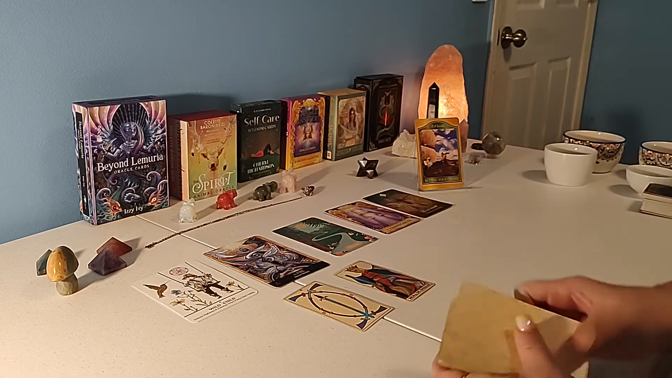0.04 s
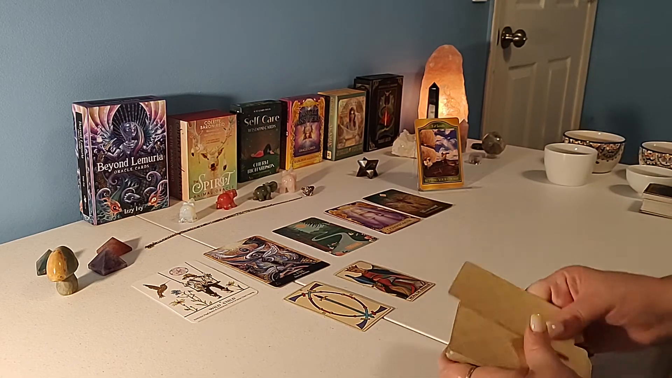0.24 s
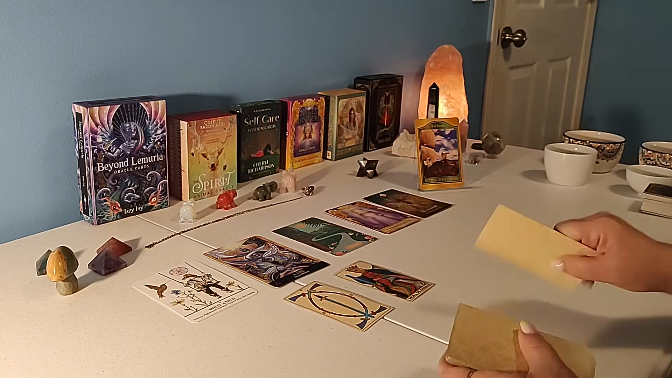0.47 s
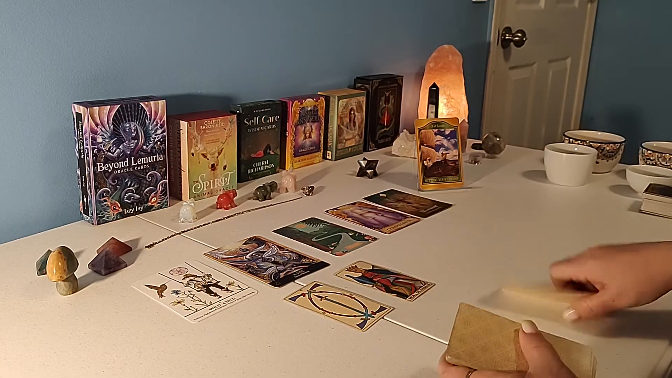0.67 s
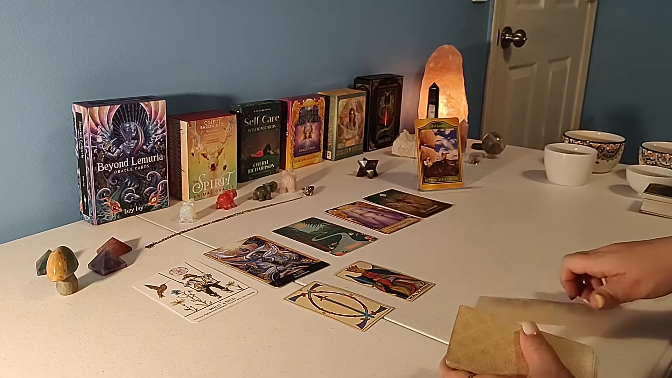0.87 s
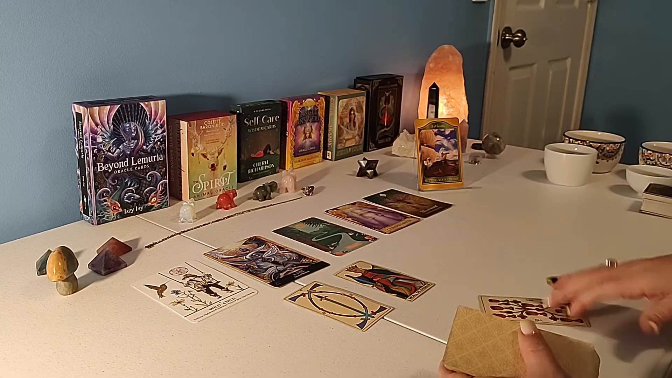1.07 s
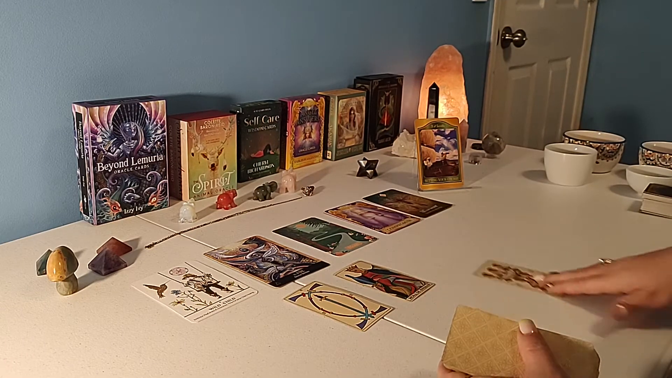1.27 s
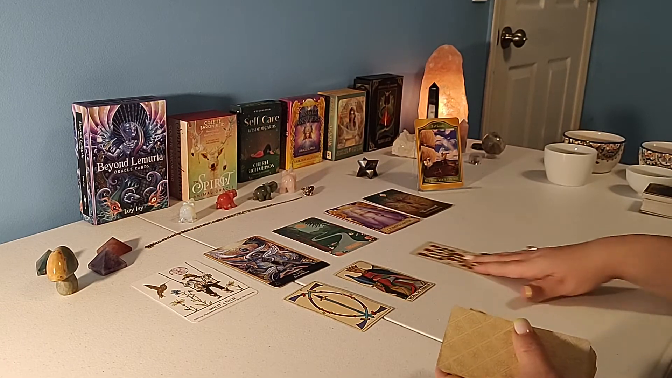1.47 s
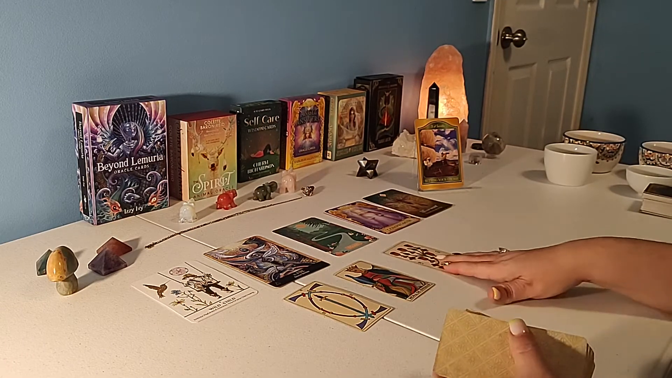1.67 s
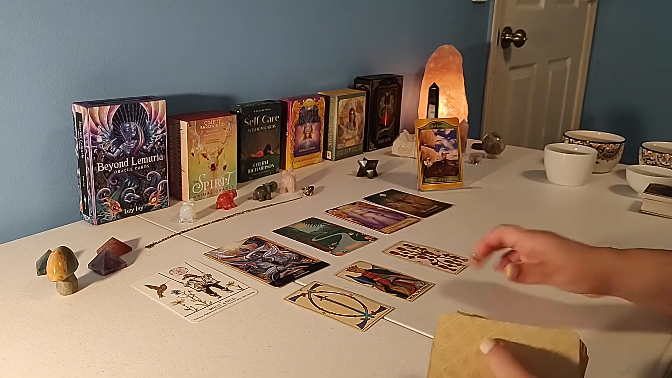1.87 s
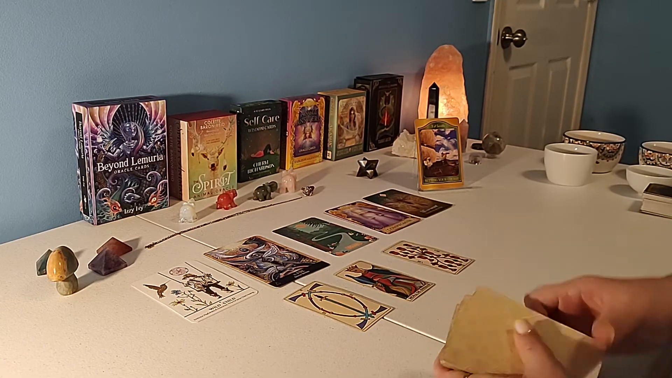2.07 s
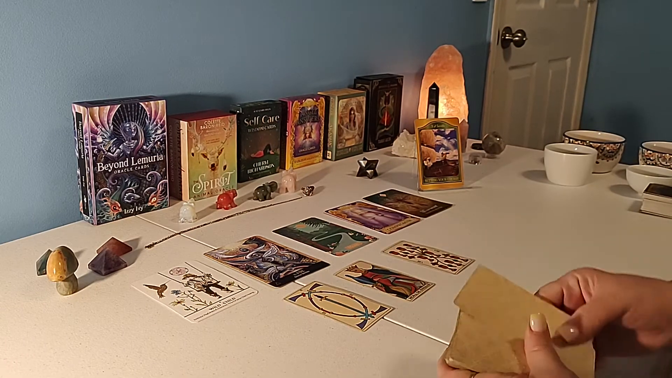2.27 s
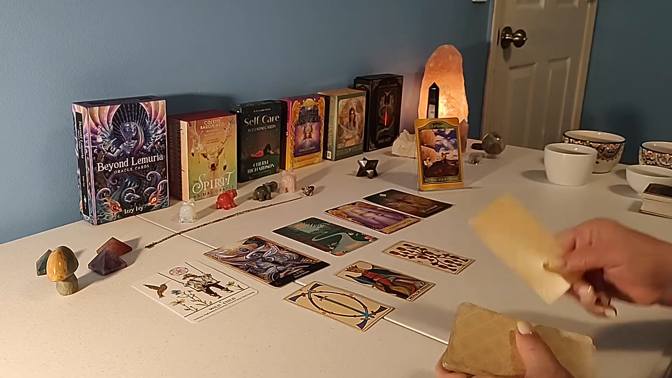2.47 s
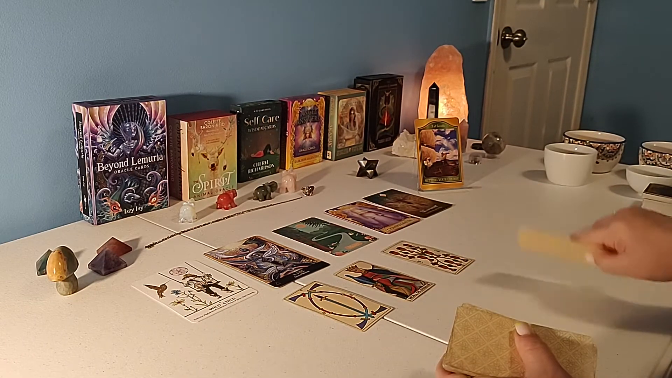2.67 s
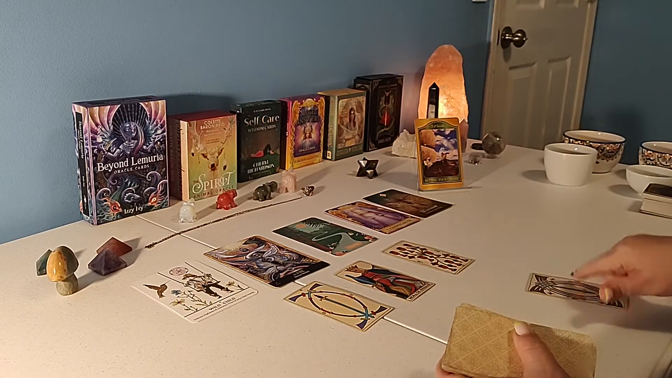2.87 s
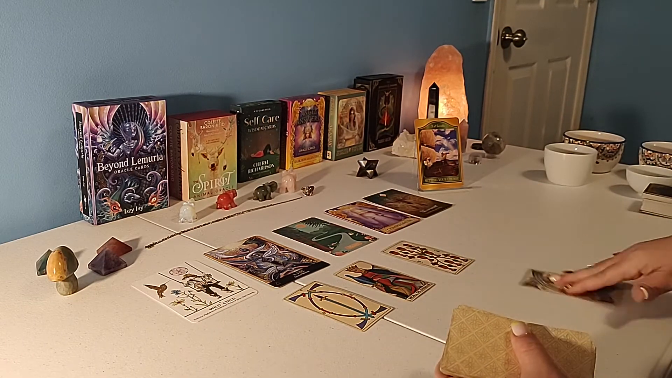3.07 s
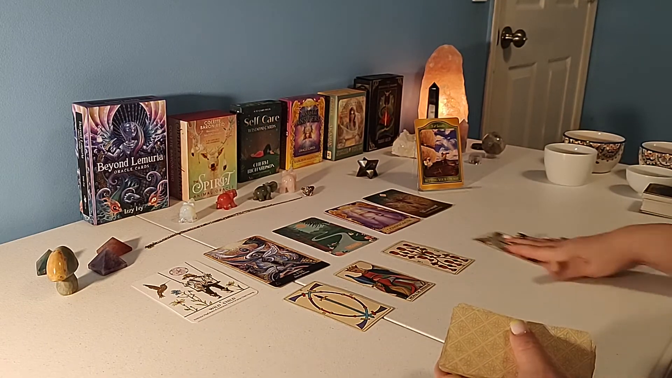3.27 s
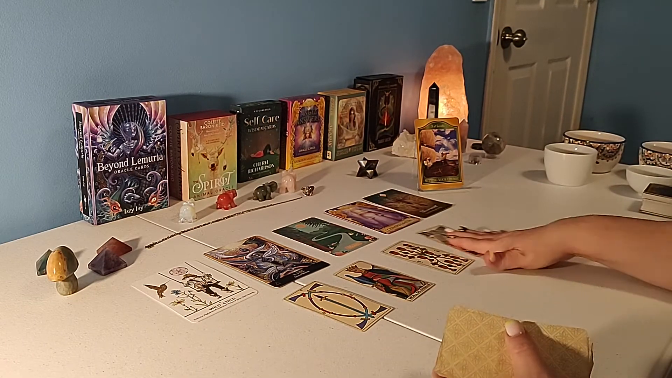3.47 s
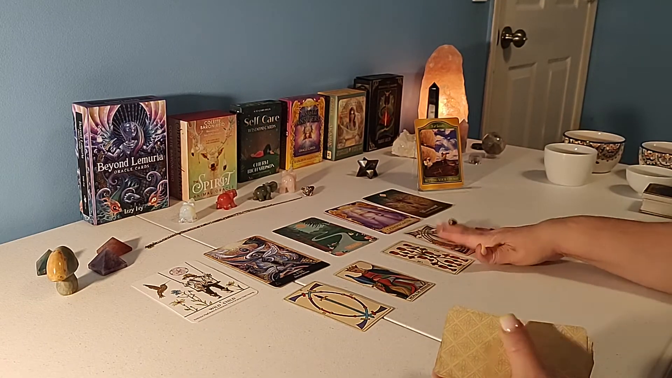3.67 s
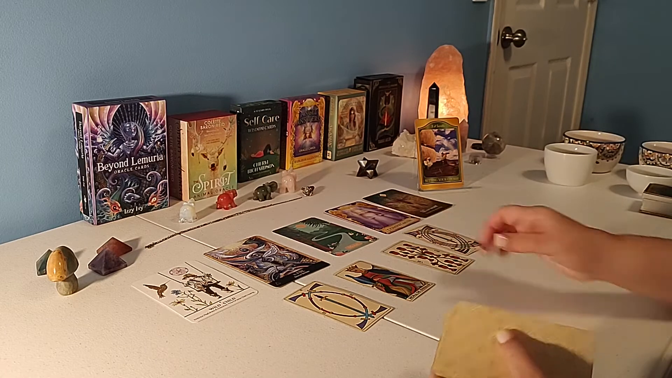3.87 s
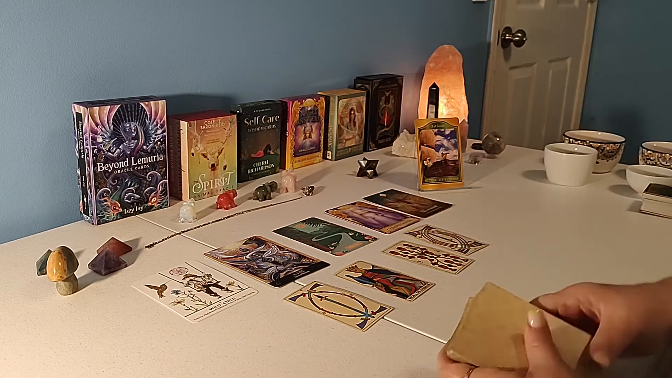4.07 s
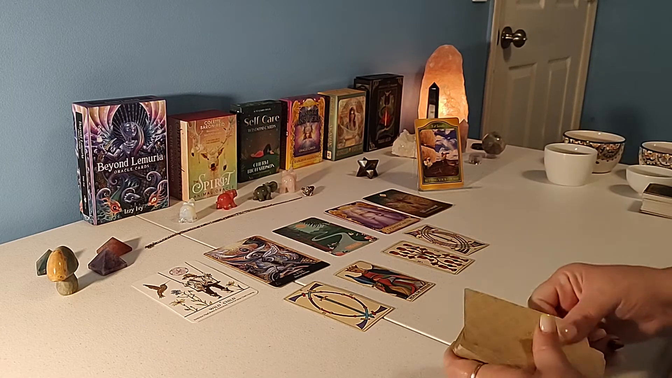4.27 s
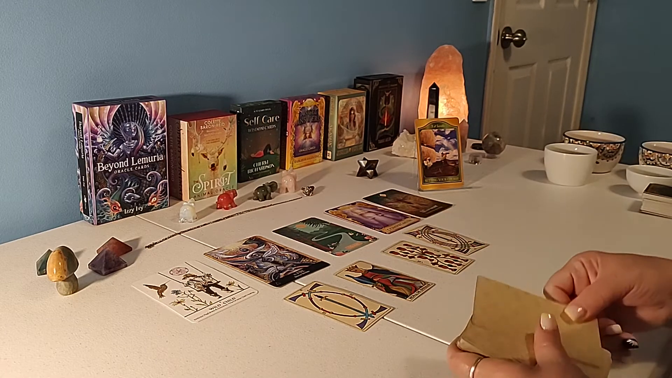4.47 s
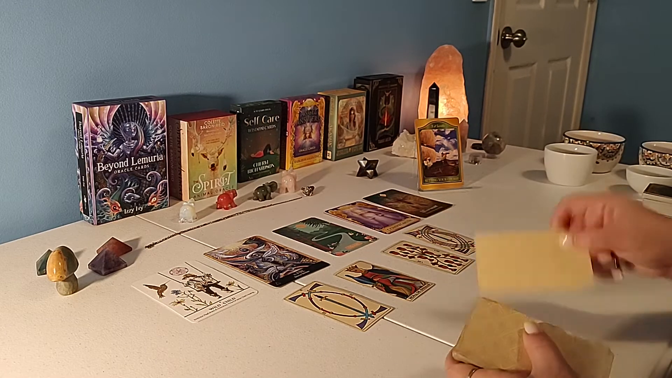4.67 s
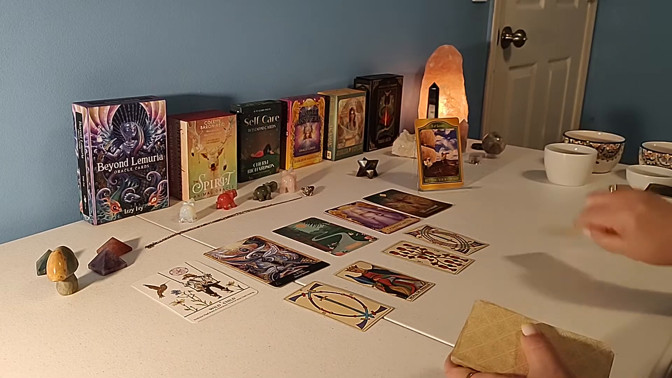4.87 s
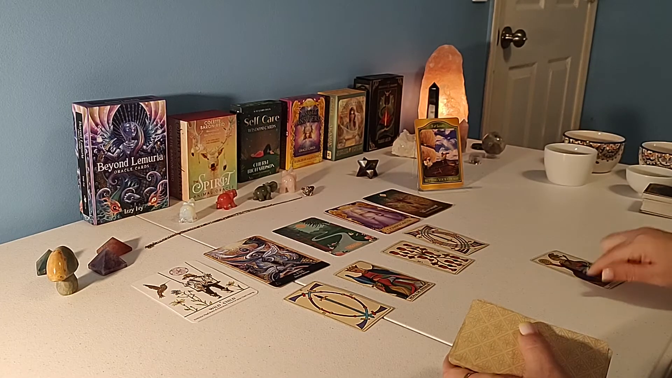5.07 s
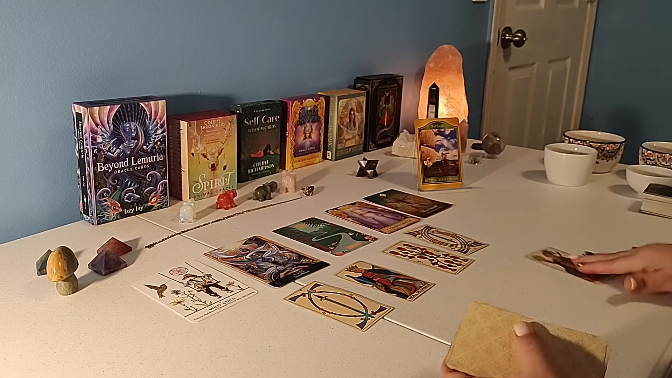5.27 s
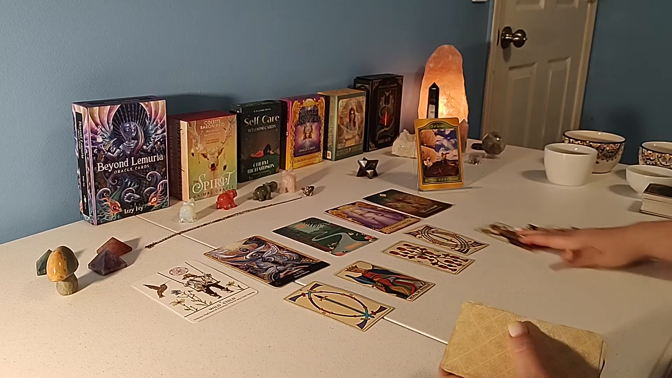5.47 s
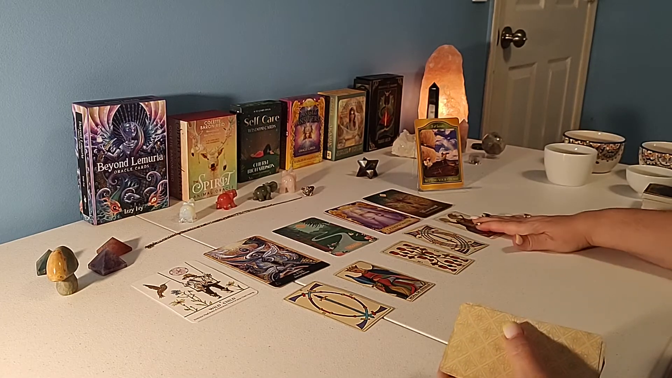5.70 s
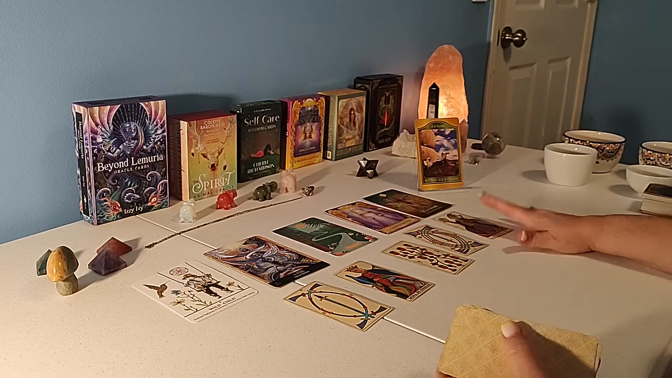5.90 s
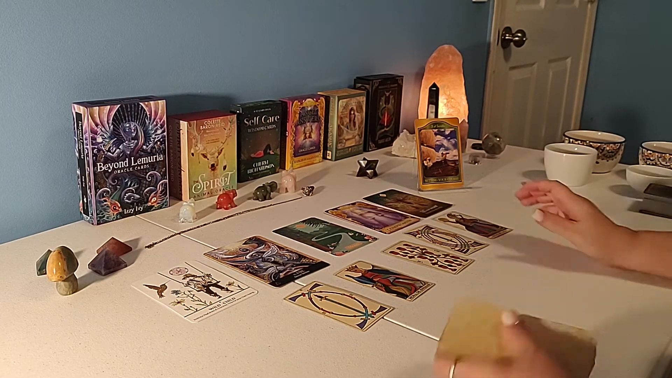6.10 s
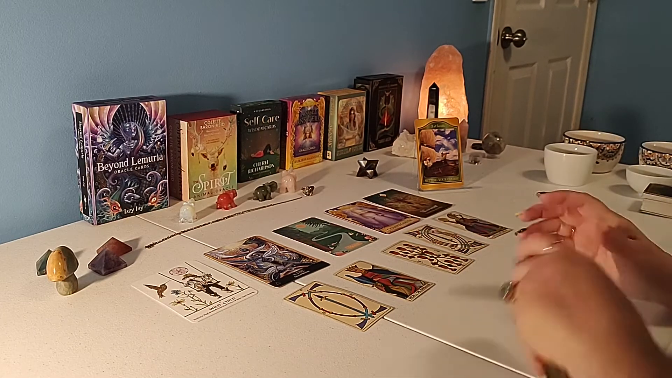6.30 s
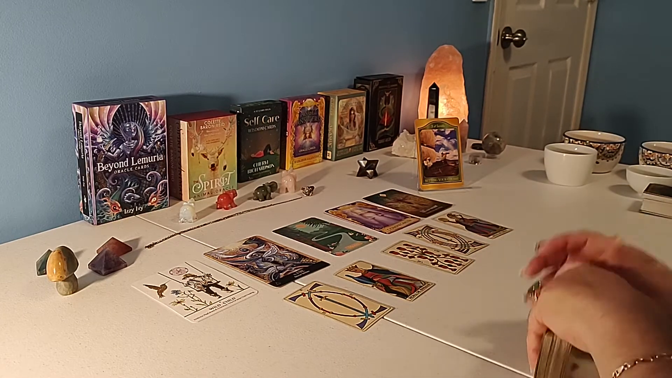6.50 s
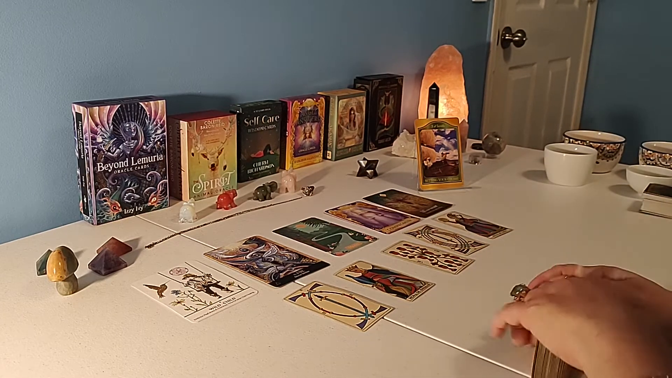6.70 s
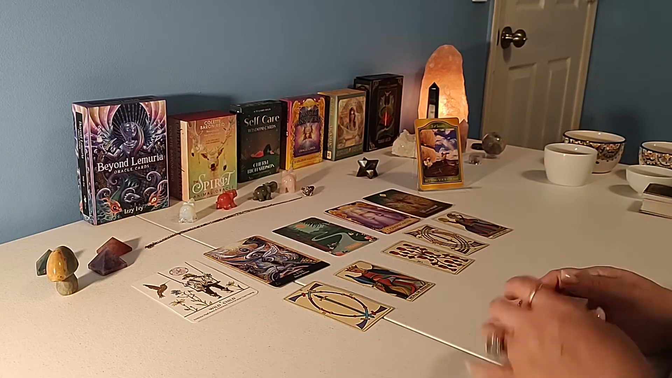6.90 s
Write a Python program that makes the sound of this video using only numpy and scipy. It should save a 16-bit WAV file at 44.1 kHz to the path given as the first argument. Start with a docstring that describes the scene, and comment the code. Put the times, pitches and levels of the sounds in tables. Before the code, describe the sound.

Three cards are drawn from a hand-held deck, snapped free, tapped down and slid hissing across a table, then the deck thumps down.

```python
"""Over quiet room air and a faint hum, a finger creaks on a hand-held deck of cards.
Three times a card is drawn with a rub, snaps free with a low pop, and clatters onto the ringing tabletop.
Fingertips tap, and each card is pushed into place with a hiss and a lower rasp; other cards brush past.
At the end the deck is put down in heavy, dull blows and its cards clap shut.
Rubs are filtered slips, hits are filtered clicks, slides are noise that follows speed; a small room echoes."""
import sys
import numpy as np
from scipy import signal
from scipy.fft import rfft, irfft
from scipy.io import wavfile

SR = 44100
rng = np.random.default_rng(int(sys.argv[2]) if len(sys.argv) > 2 else 0)


def master_out(mix):
    """Clip the mix to full scale and print it as 16-bit PCM to the path in sys.argv[1]."""
    frames = np.transpose(np.atleast_2d(mix))
    ceiling = np.clip(frames, -1, 1)
    pcm = np.round(ceiling * 32767).astype(np.int16)
    wavfile.write(sys.argv[1], SR, pcm)


N = 306223
TIME = np.arange(N) / SR  # seconds
# Levels of single sounds below are set before the room and the microphone colour them.


def undb(db):
    """Turn decibels into a gain."""
    return 10 ** (np.asarray(db) / 20)


def unit(x):
    """Scale to an average (rms) level of 1."""
    return x / np.sqrt(np.mean(x ** 2))


BLOW_S = 0.05  # a short sound's energy is averaged over this time


def blow(x, db):
    """Scale a short sound so that its energy, spread over BLOW_S, has the given level."""
    return x * undb(db) * np.sqrt(BLOW_S * SR / np.sum(x ** 2))


def along(points, hz):
    """Read between (Hz, value) points on a logarithmic pitch scale."""
    f, value = np.transpose(points)
    return np.interp(np.log(np.maximum(hz, 1)), np.log(f), value)


def colour(x, points, size=2048):
    """Filter to a (Hz, dB) curve, with nothing sounding before its cause."""
    log_gain = np.log(undb(along(points, np.fft.rfftfreq(size, 1 / SR))))
    # folding the cepstrum forward puts the filter's energy as early as possible
    cepstrum = irfft(log_gain)
    cepstrum[1:size // 2] *= 2
    cepstrum[size // 2 + 1:] = 0
    response = irfft(np.exp(rfft(cepstrum)))
    return signal.fftconvolve(x, response)[:len(x)]


def resonate(x, hz, width_hz):
    """Ring at one pitch, with gain 1 at its centre; a narrow width rings longer."""
    return signal.lfilter(*signal.iirpeak(hz, hz / min(width_hz, SR / 4), fs=SR), x)


def soften(x, top_hz, order=2):
    """Cut the treble, as a softer contact does."""
    return signal.sosfilt(signal.butter(order, min(top_hz, 0.45 * SR), fs=SR, output="sos"), x)


def add(track, at_s, x):
    """Mix a short sound into a track."""
    start = max(int(at_s * SR), 0)
    track[start:start + len(x)] += x[:N - start]


def grains(count, spread_db):
    """Dense fibre clicks: many small ones, a few large."""
    size = np.minimum(rng.exponential(size=count), 2 * np.pi)
    return unit(rng.standard_normal(count) * undb(spread_db * size))


def contact(chatter_ms, chatter_db, size=4096):
    """A first touch, then quickly dying chatter as the card settles."""
    x = grains(size, 3.0)
    x *= np.exp(-TIME[:size] / (max(chatter_ms, 0.2) / 1000))
    x *= undb(chatter_db) / np.sqrt(np.sum(x ** 2))  # energy relative to the first touch
    x[0] += 1
    return x


def diffuse(count, alike_hz):
    """Noise from all sides at two microphone ports: alike in the bass, unrelated in the treble."""
    likeness = 0.95 / (1 + (np.fft.rfftfreq(count, 1 / SR) / alike_hz) ** 2)
    shares = np.sqrt([(1 + likeness) / 2, (1 - likeness) / 2])
    mid, side = rfft(rng.standard_normal((2, count))) * shares
    return irfft(np.array([mid + side, mid - side]), count)


# tone of the room air: (frequency [Hz], relative level [dB per Hz])
AIR_SPECTRUM = [(20, -39.5), (38, -18), (58, -1), (95, -6), (140, 2), (210, -10), (350, -3), (470, -13),
                (650, -9), (1100, -14), (2000, -16.5), (4000, -21.5), (9000, -22), (16000, -17)]
# steady hum: (frequency [Hz], level [dB])
HUM = [(135, -80), (355, -76), (393, -87), (560, -88), (592, -90.5)]


def background(air_db=-67, waver_hz=5):
    """Quiet room air, with a hum of narrow noise bands whose loudness wavers."""
    air = np.array([colour(port, AIR_SPECTRUM) for port in diffuse(N, alike_hz=520)])
    hum = np.zeros(N)
    for hz, db in HUM:
        band = resonate(resonate(rng.standard_normal(N), hz, waver_hz), hz, waver_hz)
        hum += undb(db) * unit(band)
    return undb(air_db) * unit(air) + hum


# how long the room rings: (frequency [Hz], time to fall by 60 dB [s])
ROOM_DECAY = [(100, 0.25), (350, 0.27), (1000, 0.22), (3000, 0.24), (6000, 0.2), (15000, 0.15)]
# near walls and boxes: (delay [ms], relative level left [dB], relative level right [dB])
ECHOES = [(4.8, 0, 1.5), (6.3, 3, -1), (9.6, -7, -16.5), (15.3, -5.5, -21)]


def room(x, tail_db, echo_db, build_s=0.00089):
    """Direct sound, a few hard echoes and a diffuse tail whose highest treble dies first."""
    count = SR // 2
    t, f = TIME[:count], np.fft.rfftfreq(count, 1 / SR)
    # every call draws new noise, so each place has its own tail
    noise, centres = rfft(diffuse(count, alike_hz=405)), [hz for hz, _ in ROOM_DECAY]
    response = np.zeros((2, count))
    for share, (_, t60) in zip(np.eye(len(centres)), ROOM_DECAY):
        decay = undb(-60 * t / t60) * (1 - np.exp(-t / build_s))
        band = irfft(noise * along(list(zip(centres, share)), f), count)
        response += band * decay / np.sqrt(np.sum(decay ** 2))
    response *= undb(tail_db)
    # the hands work on the right, so that port hears them 6 samples sooner
    response[[0, 1], [6, 0]] += 1
    for ms, left_db, right_db in ECHOES:
        at = int(ms * SR / 1000) + rng.integers(0, 20, size=2)
        response[[0, 1], at] += undb(echo_db) * undb([left_db, right_db])
    response /= np.sqrt(np.sum(response ** 2) / 2)
    return signal.oaconvolve(x[None], response, axes=1)[:, :N]


# a finger creaks on the deck, then again lower as the grip settles: (time [s], level [dB], pitch [Hz])
CREAKS = [(0.021, -50, 563), (0.074, -45, 560), (.312, -61.5, 680), (1.191, -62, 620), (2.134, -64.5, 528),
          (4.044, -51, 630), (6.195, -45.5, 820)]
# the second creak comes later, quieter and at this share of the pitch; hiss is relative to each creak
CREAK_MS, SETTLE_S, SETTLE_DB, SETTLE_PITCH, CREAK_HISS_DB = 8.8, 0.036, -9.5, 0.59, -28
# a card is pulled along the deck, louder until it comes free:
# (time at the loudest [s], rise [ms], creak level [dB], pitch [Hz], hiss level [dB])
DRAWS = [(.44, 44, -59, 1260, -53), (2.51, 21, -51, 1030, -60.5), (4.757, 21, -50, 1600, -49.5)]
DRAW_FALL_MS = 6
# a card or hand brushes past, rising fast and trailing off:
# (time at the loudest [s], rise [ms], creak level [dB], pitch [Hz], hiss level [dB])
BRUSHES = [(0.591, 3.3, -39.5, 1140, -42), (0.605, 3.7, -44.5, 2214, -75), (0.98, 41, -66.5, 2850, -76),
           (1.84, 15, -76.5, 900, -80), (2.458, 14, -72, 2200, -60), (2.69, 19, -70, 2850, -63),
           (3.87, 26, -70.5, 895, -73), (4.39, 15, -88, 900, -74.5), (4.651, 12.3, -53.5, 1150, -50.5),
           (5.93, 69, -67.5, 2010, -80), (6.138, 27, -74, 1100, -52), (6.09, 50, -65, 3360, -76)]
BRUSH_TRAIL = 2.7  # fall time over rise time


def strokes():
    """Creaks, draws and brushes as swells of rubbing: (s, rise ms, fall ms, creak dB, pitch Hz, hiss dB)."""
    for s, db, hz in CREAKS:
        yield s, CREAK_MS, CREAK_MS, db, hz, db + CREAK_HISS_DB
        late_db = db + SETTLE_DB
        yield s + SETTLE_S, CREAK_MS, 2 * CREAK_MS, late_db, hz * SETTLE_PITCH, late_db + CREAK_HISS_DB
    for s, rise_ms, db, hz, hiss_db in DRAWS:
        yield s, rise_ms, DRAW_FALL_MS, db, hz, hiss_db
    for s, rise_ms, db, hz, hiss_db in BRUSHES:
        yield s, rise_ms, rise_ms * BRUSH_TRAIL, db, hz, hiss_db


# tone of rubbing faces and ticking edges: (frequency [Hz], relative level [dB per Hz])
TICK_SPECTRUM = [(40, -52), (200, -30), (1500, -6), (4000, -5), (8000, 0.5), (16000, -8)]


def rubs(slip_hz=170, width_share=0.4):
    """Skin and card stick and slip, ringing the held card, while the faces hiss."""
    slips = (rng.random(N) < slip_hz / SR) * rng.uniform(0.65, 1, N)
    slips += 0.023 * rng.standard_normal(N)
    hiss = unit(colour(grains(N, 2.2), TICK_SPECTRUM))
    out = np.zeros(N)
    for s, rise_ms, fall_ms, db, hz, hiss_db in strokes():
        away = (TIME - s) / (np.where(TIME < s, rise_ms, fall_ms) / 1000)
        near = np.abs(away) < 4  # beyond this the swell is silent
        swell = np.exp(-0.5 * away[near] ** 2)
        creak = swell * resonate(resonate(slips[near], hz, width_share * hz), hz, 1.1 * hz)
        out[near] += undb(db) * unit(creak) * np.sqrt(np.mean(swell ** 2))
        out[near] += undb(hiss_db) * swell * hiss[near]
    return out


# a bent card springs free of the deck:
# (time [s], pop level [dB], pitch [Hz], width [Hz], edge tick level [dB], low flap level [dB])
SNAPS = [(0.4512, -32, 1220, 606, -46.5, -46), (2.527, -48.5, 710, 494, -49.5, -60),
         (2.5382, -56, 700, 296, -63, -58), (4.7655, -37.5, 1210, 1300, -43.5, -50)]
# tone of the card's free end flapping: (frequency [Hz], relative level [dB per Hz])
FLAP_SPECTRUM = [(60, -48), (170, -31), (250, 1), (350, -17), (520, 4.5), (900, -8), (3000, -35.5)]


def snaps():
    """The edge ticks past the deck, the bent card flips straight in a cycle or two, and its free end flaps."""
    pops, ticks = np.zeros((2, N))
    for s, db, hz, width_hz, tick_db, flap_db in SNAPS:
        release = contact(4, chatter_db=-9)
        pop = resonate(resonate(release, hz, width_hz), hz, 2 * hz)
        add(pops, s, blow(soften(pop, 4500), db))
        add(pops, s, blow(colour(release, FLAP_SPECTRUM), flap_db))
        tick = colour(contact(1.0, chatter_db=7.5), TICK_SPECTRUM)
        add(ticks, s - 0.0005, blow(tick, tick_db))  # the edge slips just before the pop
    return room(pops, tail_db=4.5, echo_db=-3.5) + room(ticks, tail_db=-1, echo_db=-8)


# a dropped card clatters on the table, now edge-on, now flatter:
# (time [s], level [dB], flatness [0 edge-on to 1 face-down], chatter [ms])
LANDINGS = [(0.7646, -43.5, 0.28, 1.3), (.7835, -36.5, 0.52, 1.6), (0.8021, -36, 0.59, 1.4),
            (.812, -37.5, .95, 3.3), (.8235, -32, 0.16, 0.81), (.832, -33, 0.41, 1.8),
            (.857, -42, 0.055, 13), (.893, -49.5, 0.93, 4.7), (1.047, -70, 0.83, 4),
            (2.8485, -40.5, 0.056, 4.3), (2.866, -39.5, 0.28, 0.68), (2.898, -52.5, 1, 5.2),
            (4.19, -76, 0, 1), (5.039, -57.5, 0.076, 2.3), (5.062, -51, 0.4, 6.5)]
# how a landing sounds, as (edge-on, face-down); thud and tick are relative to the clack
LANDING_THUD_DB, LANDING_TICK_DB = (-14, 1.5), (3, -15.5)
LANDING_HZ, LANDING_TOP_HZ = (1840, 860), (12970, 7500)


def landings():
    """The flatter a card lands, the more it thuds, the less it ticks and the lower it clacks."""
    ranges = LANDING_THUD_DB, LANDING_TICK_DB, LANDING_HZ, LANDING_TOP_HZ
    for s, db, flatness, chatter_ms in LANDINGS:
        thud_db, tick_db, hz, top_hz = (np.interp(flatness, [0, 1], ends) for ends in ranges)
        yield s, db + thud_db, db, hz, db + tick_db, top_hz, chatter_ms


# tabletop tones: (frequency [Hz], relative level [dB], time to fall by 60 dB [s])
TABLE_MODES = [(276, 0.5, 0.28), (342.8, 6, .3), (420, -3, 0.63), (586, 0.5, 0.24), (654.6, 5.5, 0.16),
               (703, 5, 0.33), (859, -1.5, 0.14), (998, -1, 0.12), (1001, 3.5, 0.062), (1120, 9, 0.21)]
# tone of a thud on the table: (frequency [Hz], relative level [dB per Hz])
THUD_SPECTRUM = [(40, -51), (90, -25), (150, -10.5), (200, -9.5), (300, 0.5), (550, 3), (900, -7),
                 (2000, -29.5), (8000, -55.5)]


def taps(clack_top_hz=4300, ring_db=-4):
    """Each hit thuds on the table, clacks in the card and ticks at its edge; the tabletop rings on."""
    thuds, clacks, ticks = np.zeros((3, N))
    hits = [*landings(), *presses(), *deck()]
    for s, thud_db, clack_db, hz, tick_db, top_hz, chatter_ms in hits:
        thud = colour(contact(chatter_ms, chatter_db=-1.5), THUD_SPECTRUM)
        clack = resonate(resonate(contact(chatter_ms, chatter_db=-1.0), hz, 1.53 * hz), hz, 2.25 * hz)
        tick = colour(contact(chatter_ms, chatter_db=3.5), TICK_SPECTRUM)
        add(thuds, s, blow(thud, thud_db))
        add(clacks, s, blow(soften(clack, clack_top_hz, order=8), clack_db))
        add(ticks, s, blow(soften(tick, top_hz, order=1), tick_db))
    ring = np.zeros(N)
    for hz, db, t60 in TABLE_MODES:
        width_hz = np.log(1000) / (np.pi * t60)  # a longer ring is a narrower resonance
        ring += undb(db) * resonate(thuds + clacks, hz, width_hz)
    # the table radiates all round, while the bright ticks beam straight at the microphone
    body = room(thuds + undb(ring_db) * ring, tail_db=8.5, echo_db=-4.5)
    body += room(clacks, tail_db=6, echo_db=-4.5)
    return body + room(ticks, tail_db=2.5, echo_db=-12.0)


# a fingertip presses the card flat: its edge ticks, then the finger thuds down:
# (time [s], tick level [dB], thud level [dB])
PRESSES = [(1.222, -48.5, -50), (3.1794, -58, -64), (5.1328, -45, -53), (5.376, -69, -68)]
PRESS_LAG_S, PRESS_HZ, PRESS_TOP_HZ, PRESS_CHATTER_MS = 0.0083, 930, 16600, 3


def presses(early_thud_db=-11, clack_db=-11, late_tick_db=-2):
    """Two contacts for each press: the card's edge, then the fingertip on top of it."""
    for s, tick_db, thud_db in PRESSES:
        early_db, late_db = thud_db + early_thud_db, tick_db + late_tick_db
        yield s, early_db, tick_db + clack_db, PRESS_HZ, tick_db, PRESS_TOP_HZ, PRESS_CHATTER_MS
        at_s = s + PRESS_LAG_S
        yield at_s, thud_db, late_db + clack_db, PRESS_HZ, late_db, PRESS_TOP_HZ, PRESS_CHATTER_MS


# share of top speed at first touch; time to ease off [s]; time to brake [s]
CREEP, EASE_S, BRAKE_S = 0.17, 0.059, 0.18


def push(start_s, fastest_s, stop_s, steady):
    """Speed of a pushed card as a share of its top speed: shove, ease off, brake."""
    shove = CREEP + (1 - CREEP) * np.clip((TIME - start_s) / (fastest_s - start_s), 0, 1) ** 2
    ease = steady + (1 - steady) * np.exp(-np.maximum(TIME - fastest_s, 0) / EASE_S)
    brake = np.clip((stop_s - TIME) / BRAKE_S, 0, 1)
    return np.maximum(shove * ease * brake, 0) * (TIME > start_s)


JUDDER_HZ, JUDDER_DB = 30, 1.9  # new random grip this often; typical size of the change in level


def judder():
    """Uneven grip of the tabletop, as a gain that drifts between random values."""
    knots = np.arange(0, N / SR, 1 / JUDDER_HZ)
    return undb(JUDDER_DB * np.interp(TIME, knots, rng.standard_normal(len(knots))))


# a card is shoved off, eases to a steady pace and brakes into place: (start [s], fastest [s], stop [s],
# hiss level at top speed [dB], rasp level at top speed [dB], steady pace [share of top speed])
SLIDES = [(1.258, 1.344, 1.745, -38.5, -50.5, 0.45), (3.172, 3.277, 3.698, -38.5, -49, .56),
          (5.372, 5.53, 5.823, -40, -48.5, 0.92)]
# tones of the sliding face: (frequency [Hz], relative level [dB per Hz])
HISS_SPECTRUM = [(200, -50), (1500, -14.5), (3000, -6), (4200, -6.5), (9000, 3.5), (16000, -3)]
RASP_SPECTRUM = [(60, -37), (140, -9), (300, -8), (600, -6), (1050, 0.5), (1700, 2.5), (2700, -1),
                 (4500, 3.5), (12000, -41.5)]
HISS_POWER, RASP_POWER = 1.42, 0.72  # each grows as this power of speed


def slides(count=6):
    """Fibres scrape the tabletop: the hiss climbs steeply with speed, the lower rasp gently."""
    hiss = unit(colour(grains(N, 2.3), HISS_SPECTRUM))
    rasp = unit(colour(grains(N, 3.9), RASP_SPECTRUM)) * judder()
    places = np.zeros((count, N))
    for start_s, fastest_s, stop_s, hiss_db, rasp_db, steady in SLIDES:
        speed = push(start_s, fastest_s, stop_s, steady)
        scrape = hiss * undb(hiss_db) * speed ** HISS_POWER
        scrape += rasp * undb(rasp_db) * speed ** RASP_POWER
        # the card passes several places on its way, each with its own echo pattern
        position = np.interp(TIME, [start_s, stop_s], [0, count - 1])
        closeness = np.clip(1 - np.abs(position - np.arange(count)[:, None]), 0, 1)
        places += scrape * closeness ** 0.65
    return sum(room(x, tail_db=8.5, echo_db=-11) for x in places)


# the deck is put down, corner, edge and face: (time [s], thud level [dB], clack level [dB])
DECK_BLOWS = [(6.6272, -59, -46.5), (6.6438, -28.5, -30), (6.6632, -34.5, -33), (6.6776, -35.5, -26.5)]
DECK_HZ, DECK_TOP_HZ, DECK_CHATTER_MS = 910, 7000, 1.8
DECK_TICK_DB = -19  # relative to the clack
# each blow rebounds once, this much later and quieter
REBOUND_S, REBOUND_THUD_DB, REBOUND_CLACK_DB = 0.0085, -13.5, -10
# its cards then clap shut on each other
CLAP_S, CLAP_DB, CLAP_HZ, CLAP_CHATTER_MS = 6.680, -28, 3300, 7.6


def deck(clap_thud_db=-18, clap_tick_db=-14):
    """Heavy, dull blows with their rebounds, and the clap of the closing stack."""
    for s, thud_db, clack_db in DECK_BLOWS:
        first = s, thud_db, clack_db
        rebound = s + REBOUND_S, thud_db + REBOUND_THUD_DB, clack_db + REBOUND_CLACK_DB
        for at_s, thud, clack in (first, rebound):
            yield at_s, thud, clack, DECK_HZ, clack + DECK_TICK_DB, DECK_TOP_HZ, DECK_CHATTER_MS
    thud, tick = CLAP_DB + clap_thud_db, CLAP_DB + clap_tick_db
    yield CLAP_S, thud, CLAP_DB, CLAP_HZ, tick, DECK_TOP_HZ, CLAP_CHATTER_MS


def scene():
    """Cards in the hand and on the table, over the quiet of the room."""
    hand = room(rubs(), tail_db=3.5, echo_db=-5.5) + snaps()
    return background() + hand + taps() + slides()


# microphone colour: (frequency [Hz], left level [dB], right level [dB])
MIC_COLOUR = [(300, 1, 1), (1050, 1, 0.5), (1510, -2, -2.5), (2350, 1, -2.5), (2880, -1.5, -1.5),
              (3670, 4.5, 3.5), (4330, -3.5, -1), (5500, -10, -7), (7700, -11.5, -12), (8620, -15.5, -2.5),
              (10450, -12, -10.5), (11900, -16.5, -15), (13500, -16, -9.5), (15120, -6.5, -4.5)]
TOP_HZ = 15750  # the microphone passes almost nothing above this


def record(dry):
    """Each port of the microphone has its own colour; a steep filter cuts the top."""
    ports = []
    for k, x in enumerate(dry):
        ports.append(colour(x, [(hz, db[k]) for hz, *db in MIC_COLOUR]))
    return signal.sosfilt(signal.ellip(10, 0.2, 70, TOP_HZ, fs=SR, output="sos"), np.array(ports))


dry = scene()
out = record(dry)
master_out(out)
```